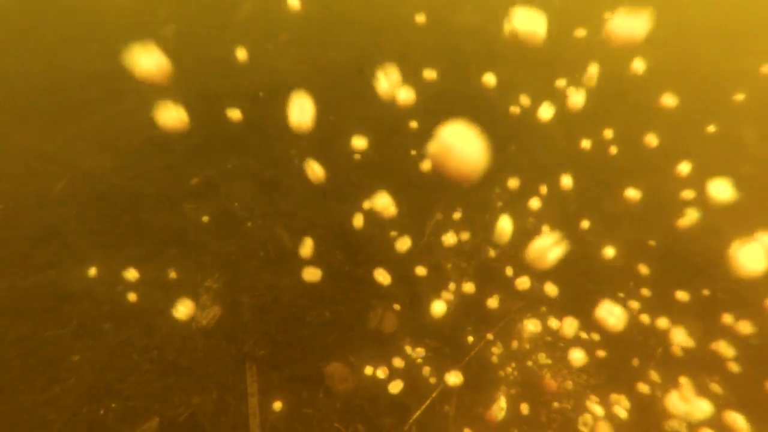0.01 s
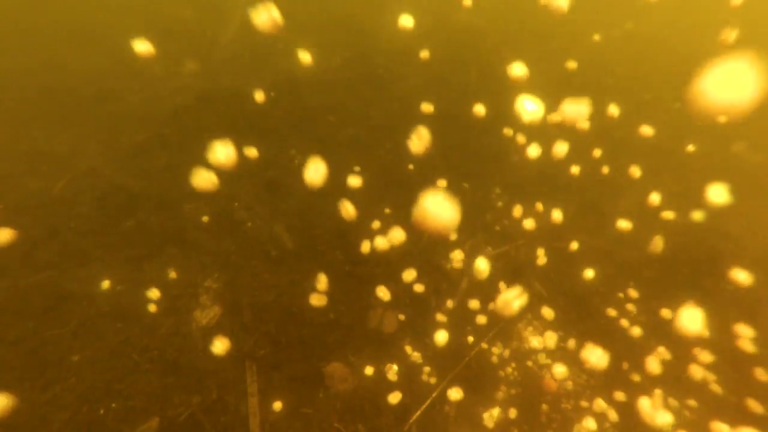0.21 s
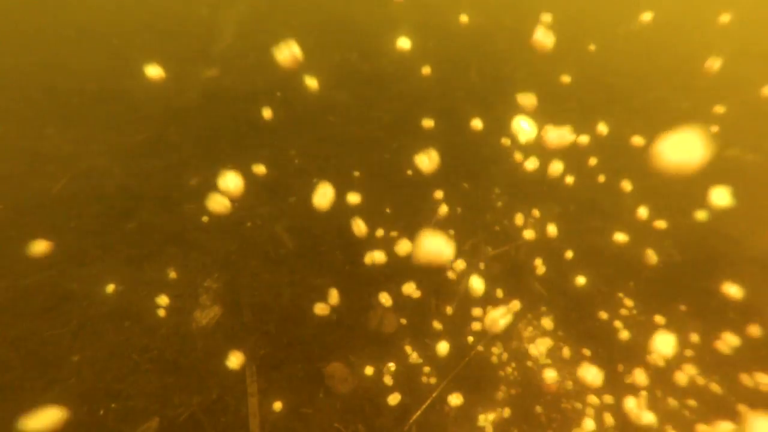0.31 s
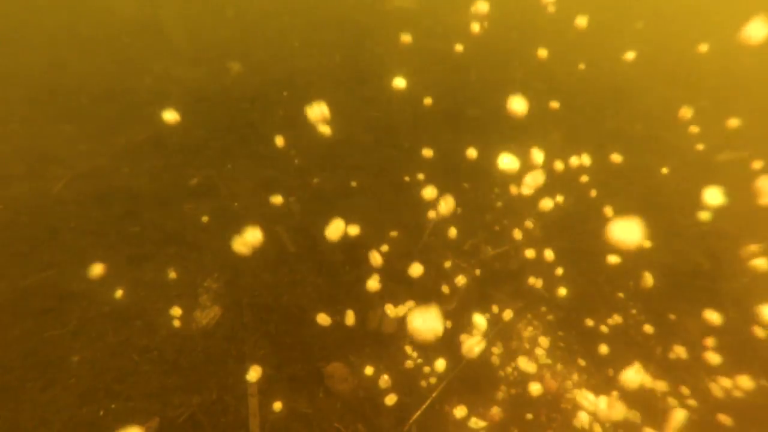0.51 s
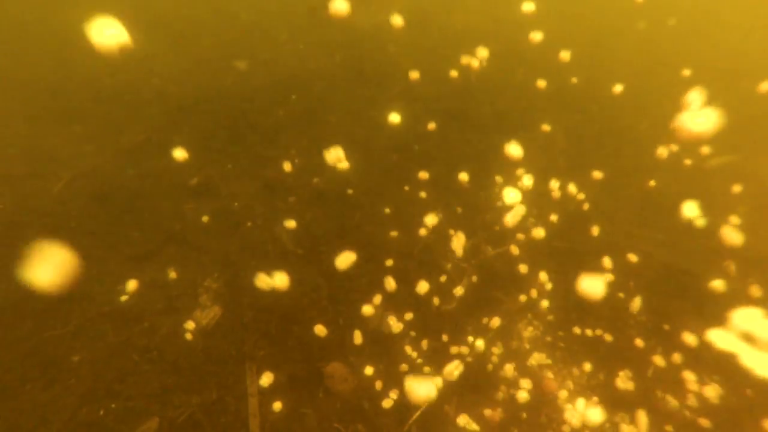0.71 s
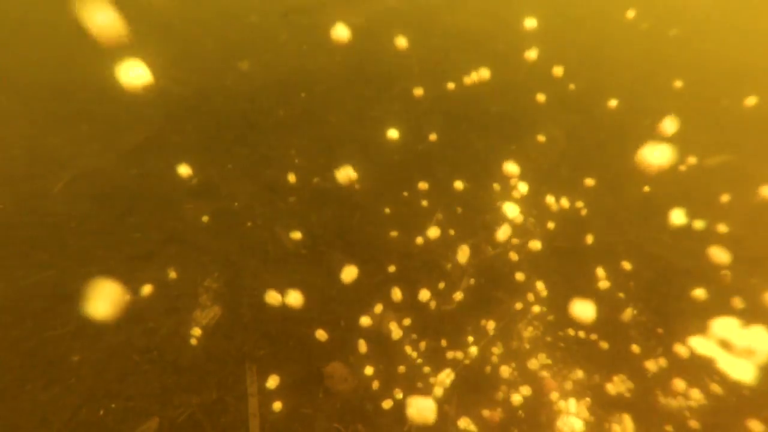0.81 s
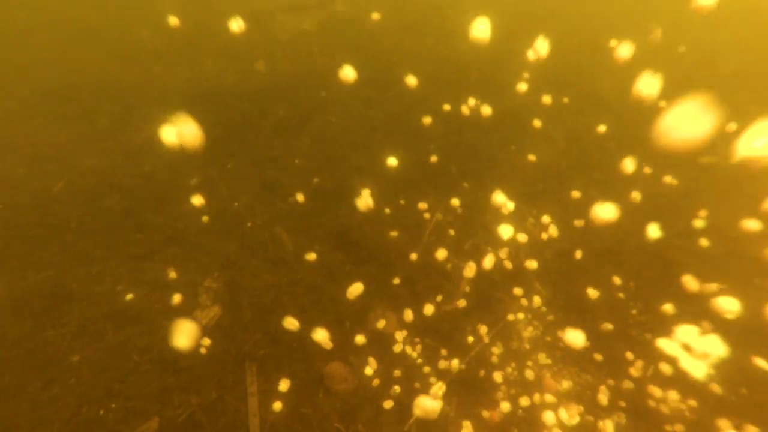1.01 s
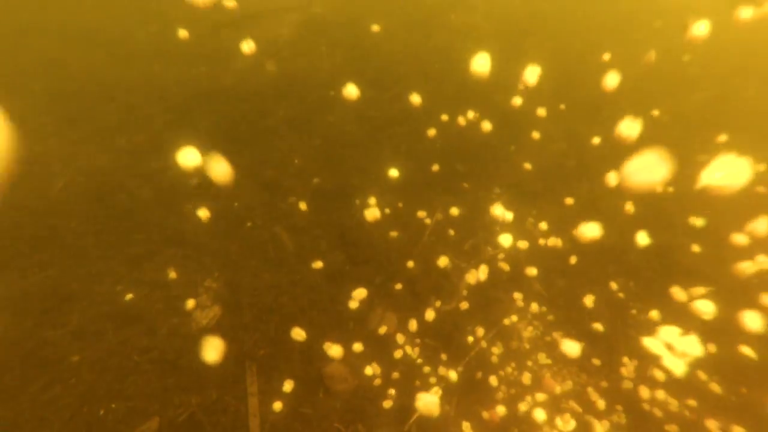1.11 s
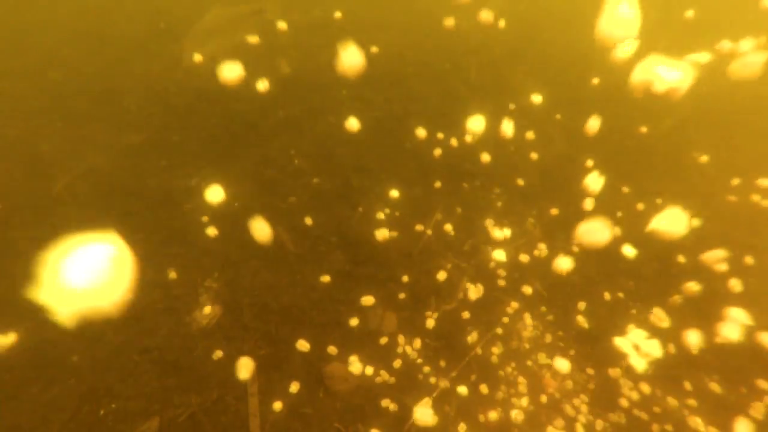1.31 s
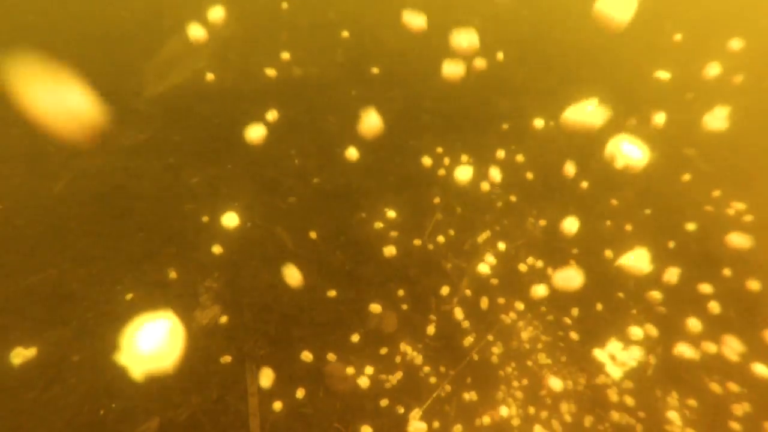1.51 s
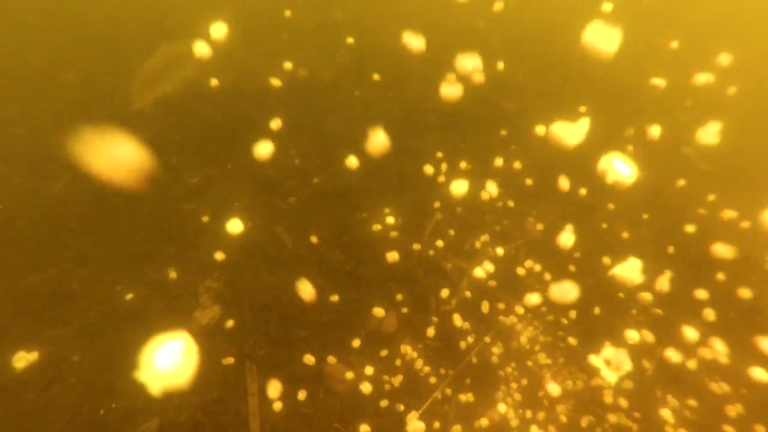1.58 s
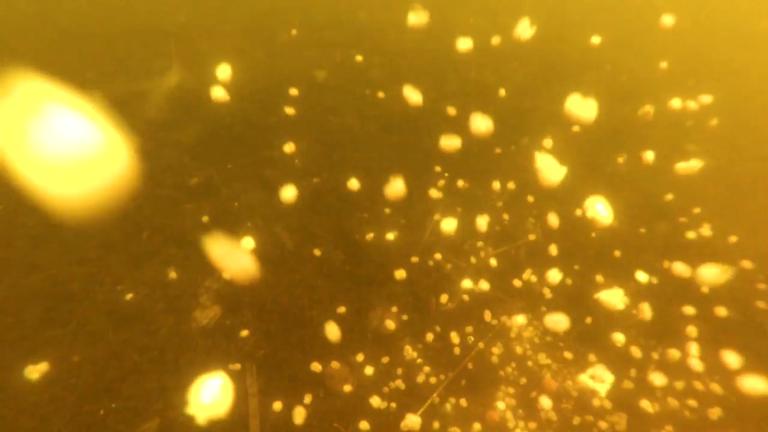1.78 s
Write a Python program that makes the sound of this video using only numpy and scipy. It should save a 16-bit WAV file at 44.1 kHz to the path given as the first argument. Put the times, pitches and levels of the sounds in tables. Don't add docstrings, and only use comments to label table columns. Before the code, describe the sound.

Heard by microphones inside an underwater housing, sinking grains make short, dry, hollow taps and fine ticks, busiest early, with a later low thud; at the end bubbles blip and a small splash thickens.

```python
import sys
import numpy as np
from scipy import signal
from scipy.fft import rfft, irfft
from scipy.io import wavfile
from scipy.ndimage import uniform_filter1d

SR = 44100
rng = np.random.default_rng(int(sys.argv[2]) if len(sys.argv) > 2 else 0)


def master_out(mix):
    frames = np.transpose(np.atleast_2d(mix))
    ceiling = np.clip(frames, -1, 1)
    pcm = np.round(ceiling * 32767).astype(np.int16)
    wavfile.write(sys.argv[1], SR, pcm)


def nominal_scale(level):
    x = np.asarray(level, float) / 20
    return 10 ** x


N = 79380


def curve_db(points, hz):
    pitch_hz, level_db = np.array(points).T
    return np.interp(np.log(hz), np.log(pitch_hz), level_db)


def coloured(points, lo_hz=0, hi_hz=1e5):
    hz = np.maximum(np.arange(N // 2 + 1) * SR / N, 1)
    gain = nominal_scale(curve_db(points, hz)) * (hz >= lo_hz) * (hz < hi_hz)
    return irfft(rfft(rng.standard_normal(N)) * gain, N)


def level(x, rms_db):
    return x * nominal_scale(rms_db) / np.sqrt(np.mean(x ** 2))


def walk(rate_hz):
    hold = int(SR / rate_hz)
    steps = np.repeat(rng.standard_normal(N // hold + 1), hold)
    smooth = uniform_filter1d(uniform_filter1d(steps, hold), hold)
    return level(smooth[:N], 0)


# pitch_hz, level_db (per Hz)
WATER_SPECTRUM = [(20, -3), (35, -0.5), (70, -5), (130, -9), (320, -17), (700, -21.5), (1500, -36),
                  (4000, -32.5)]
WATER_DB, SURGE_DB, FLICKER_DB = -63.5, -1.5, 1.5


def water():
    surge = walk(3)
    rumble = np.zeros(N)
    for edge_hz in 20 * 2 ** np.arange(0, 8, .5):
        band = coloured(WATER_SPECTRUM, edge_hz, edge_hz * np.sqrt(2))
        rumble += band * nominal_scale(SURGE_DB * surge + FLICKER_DB * walk(12))
    return level(rumble, WATER_DB)


# pitch_hz, level_db (per Hz)
HISS_SPECTRUM = [(20, -14), (1000, 3.5), (3000, -4.5), (6000, -6), (10000, -7.5), (15000, -10.5)]
# pitch_hz, level_db
HISS_SIDE = [(500, -16), (1500, -14), (3000, -8), (5000, -5), (15000, -6)]
HISS_DB = -68.5


def hiss():
    mid = coloured(HISS_SPECTRUM, 14)
    side_spectrum = [(hz, db + curve_db(HISS_SPECTRUM, hz)) for hz, db in HISS_SIDE]
    side = coloured(side_spectrum, 100)
    scale = nominal_scale(HISS_DB) / mid.std()
    return scale * (mid + side * np.array([[1], [-1]]))


def add(out, start_s, hz, db, t60_s, rise_s):
    i = int(start_s * SR)
    count = min(len(out) - i, int(np.max(t60_s) * 1.3 * SR))
    t = np.arange(1, count + 1) / SR - (start_s - i / SR)
    hz, db, t60_s = (np.reshape(v, (-1, 1)) for v in (hz, db, t60_s))
    rings = -nominal_scale(db) * np.sin(2 * np.pi * hz * t) * np.exp(-np.log(1000) * t / t60_s)
    swell = (1 - np.exp(-t / rise_s)) ** 2
    out[i + 1:i + 1 + count] += (swell * rings.sum(axis=0))[:len(out) - i - 1]


# pitch_hz, t60_s
BODY_MODES = [(740, .022), (330, .115), (580, .075)]
TWIN_HZ, TWIN_DB, TWIN_T60_S = 296, -4, .13
BODY_RISE_S, SCATTER_DB, DETUNE = 0.00048, 1.5, .012


def taps(rows, modes, rise_s):
    out = np.zeros(N)
    hz, db, t60_s = np.array(modes).T
    body_hz, body_t60_s = np.array(BODY_MODES).T
    chance = rng.standard_normal((len(rows), 3, len(hz)))
    for (start_s, tap_db, *body_db), (detune, scatter, body) in zip(rows, chance):
        add(out, start_s, hz * (1 + DETUNE * detune), db + tap_db + SCATTER_DB * scatter, t60_s, rise_s)
        add(out, start_s, body_hz * (1 + DETUNE * body[:3]), body_db, body_t60_s, BODY_RISE_S)
        twin_db = body_db[1] + TWIN_DB + 2 * SCATTER_DB * body[4]
        add(out, start_s, TWIN_HZ * (1 + DETUNE * body[3]), twin_db, TWIN_T60_S, BODY_RISE_S)
    return out


# pitch_hz, level_db, t60_s
SHELL_MODES = [(1035, 5.5, 0.016), (1344, -12, 0.042), (1380, 0.5, 0.0092), (2084, -10.5, 0.02),
               (2190, -31, .015), (2950, -19, .014), (3340, -22.5, 0.016), (7000, -28.5, .006)]
SHELL_RISE_S = 0.00034
TICK_DB, TICK_SPREAD_DB, TICK_TILT_DB = -73, 2.5, -5


def ticks(count):
    rows = []
    for when, rank, _ in rng.random((count, 3)):
        db = TICK_DB - TICK_SPREAD_DB * np.log(1 - rank)
        rows.append((when * N / SR, db + TICK_TILT_DB, db - 3, db, db - 4))
    return taps(rows, SHELL_MODES, SHELL_RISE_S)


# start_s, rim_db, panel_db, low_body_db, high_body_db
RIM_TAPS = [
    (.0803, -52, -67, -43.5, -43),
    (.9267, -43, -39.5, -37, -36.5),
]
# pitch_hz, level_db, t60_s
RIM_MODES = [(980, -4.5, 0.024), (1456, 3, 0.023), (2190, -4, 0.017), (3000, -12, 0.014),
             (3610, -9.5, 0.02)]


def rim_taps():
    return taps(RIM_TAPS, RIM_MODES, SHELL_RISE_S)


# start_s, shell_db, panel_db, low_body_db, high_body_db
SHELL_TAPS = [(.136, -55.5, -68, -41.5, -31), (.302, -52, -50, -42, -49.5),
              (.3057, -39.5, -35.5, -52.5, -62), (.392, -62, -60, -64, -55.5), (.41, -61, -60, -60, -58),
              (.576, -62, -70, -63, -55), (.69, -58, -55, -56.5, -62.5), (.4357, -45, -35.5, -44.5, -74),
              (.466, -72, -69, -68, -58), (.5065, -47, -41, -46, -50), (.5465, -46, -42, -55.5, -60),
              (1.572, -38, -46, -51.5, -62), (1.575, -37.5, -60.5, -51, -57.5)]


def shell_taps():
    return taps(SHELL_TAPS, SHELL_MODES, SHELL_RISE_S)


# start_s, level_db
SHOVES = [
    (0.141, -51),
    (.2475, -36.5),
    (0.5078, -49),
    (0.929, -49),
    (1.247, -58),
]
# pitch_hz, level_db, t60_s
SWAY_MODES = [(34.6, -4, .7), (99, -14, .5)]


def sway():
    out = np.zeros(N)
    hz, db, t60_s = np.array(SWAY_MODES).T
    for start_s, shove_db in SHOVES:
        add(out, start_s, hz, db + shove_db, t60_s, rise_s=.003)
    return out


# start_s, back_db, panel_db, low_body_db, high_body_db
THUDS = [
    (.233, -38, -65, -58.5, -59.5),
    (1.234, -63, -47.5, -67.5, -66),
    (1.249, -29, -30, -73, -51),
    (1.2635, -35.5, -61.5, -72, -54.5),
    (1.464, -51, -68.5, -71, -77),
]
# pitch_hz, level_db, t60_s
BACK_MODES = [(255, -14, 0.0093), (395, -1, .012), (523, 6.5, 0.013), (1126, -7, 0.015),
              (1366, -27.5, 0.015), (2290, -23.5, 0.012), (3360, -21, 0.0099), (6920, -15.5, 0.006),
              (13500, -36, .003)]


def thuds():
    return taps(THUDS, BACK_MODES, rise_s=0.00058)


# start_s, face_db, panel_db, low_body_db, high_body_db
FACE_TAPS = [
    (.2475, -8, -54, -31.5, -26),
    (.7403, -43.5, -39.5, -67, -56),
]
# pitch_hz, level_db, t60_s
FACE_MODES = [(210, -29, 0.049), (655, -6.5, 0.031), (967, -14, 0.035), (1100, 5, 0.016),
              (1230, -4.5, 0.023), (1847, -5.5, 0.016), (2110, -5.5, 0.012), (2420, -13, 0.015),
              (2780, -20, 0.016), (3363, -12.5, 0.01), (4600, -42, .008), (5700, -32, .006),
              (7200, -54, .004)]


def face_taps():
    return taps(FACE_TAPS, FACE_MODES, rise_s=0.00056)


# start_s, port_db, panel_db, low_body_db, high_body_db
PORT_TAPS = [
    (.5994, -13.5, -24, -43, -62),
    (.627, -40.5, -32, -45, -47),
]
# pitch_hz, level_db, t60_s
PORT_MODES = [(200, -24, 0.0083), (420, -21, 0.032), (648, -6.5, 0.011), (1005, -1, 0.011),
              (1510, 5.5, 0.0053), (1670, 2, 0.01), (1810, 5.5, 0.0072), (2085, -1.5, 0.0094),
              (2950, -42, .008), (4550, -24.5, 0.0067), (7300, -29.5, 0.0046), (9000, -32, .002),
              (10400, -22, 0.0052), (11600, -16, 0.0032)]


def port_taps():
    return taps(PORT_TAPS, PORT_MODES, rise_s=0.00038)


# start_s, pitch_hz, level_db, t60_s
BUBBLES = [
    (1.572, 365, -29.5, 0.03),
    (1.594, 306, -48, 0.11),
    (1.622, 766, -53, 0.11),
    (1.746, 660, -50.5, 0.036),
    (1.753, 744, -48, 0.035),
    (1.759, 846, -50, 0.023),
    (1.764, 683, -46, 0.037),
    (1.773, 760, -45.5, 0.029),
    (1.7846, 845, -23.5, 0.021),
    (1.796, 935, -35, 0.09),
]


def bubbles():
    out = np.zeros(N)
    for start_s, hz, db, t60_s in BUBBLES:
        add(out, start_s, hz, db, t60_s, rise_s=0.0012)
    return out


# start_s, level_db
SPLASH = [
    (1.738, -71),
    (1.77, -62),
    (1.779, -50),
    (1.788, -41),
    (1.8, -47),
]
# pitch_hz, level_db
SPLASH_SIZES = [(760, 3.5), (900, 0), (1750, 6), (1880, -6), (2200, -3), (2550, -0.5), (3000, 5),
                (3550, -0.5), (4200, -13.5)]
SPLASH_CYCLES, SPLASH_SPREAD, SMALL_LEAD_S = 31, 0.0396, 0.0044


def splash(count):
    out = np.zeros(N)
    time_s, loud_db = np.array(SPLASH).T
    for k, (when, detune, softness) in enumerate(rng.random((count, 3))):
        start_s = time_s[0] + np.sqrt(when) * (N / SR - time_s[0])
        hz, db = SPLASH_SIZES[k % len(SPLASH_SIZES)]
        cloud_db = np.interp(start_s + SMALL_LEAD_S * np.log2(hz / 1000), time_s, loud_db)
        pitch_hz = hz * (1 + SPLASH_SPREAD * (2 * detune - 1))
        add(out, start_s, pitch_hz, db + cloud_db - 8 * softness, SPLASH_CYCLES / hz, 0.5 / hz)
    return out


def scene():
    grains = ticks(count=50) + rim_taps() + shell_taps() + thuds() + face_taps() + port_taps()
    mono = water() + grains + sway() + bubbles() + splash(count=135)
    pair_db = .03
    return mono * nominal_scale(np.array([[-pair_db], [pair_db]]))


def top_cut(x):
    return signal.sosfilt(signal.butter(12, 15240, fs=SR, output="sos"), x)


def record(dry):
    mix = dry + hiss()
    return top_cut(mix)


dry = scene()
out = record(dry)
master_out(out)
```